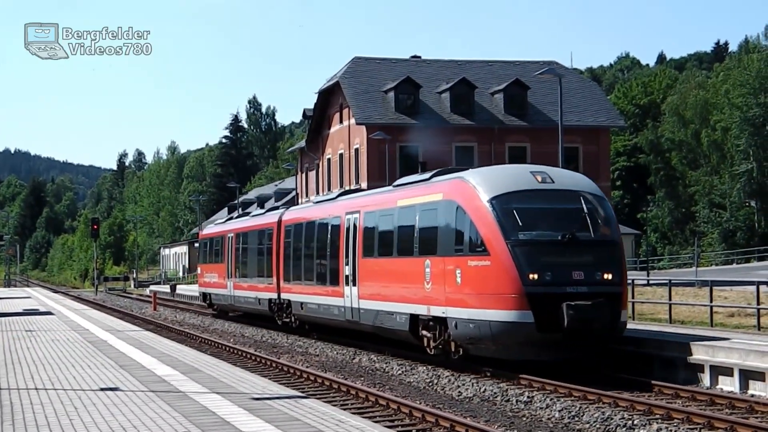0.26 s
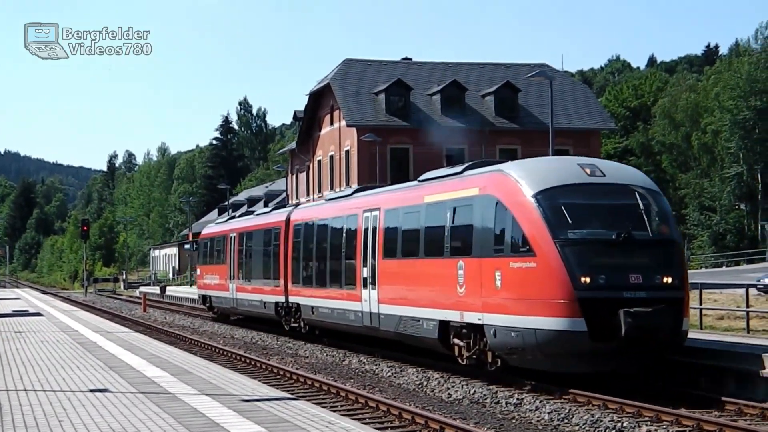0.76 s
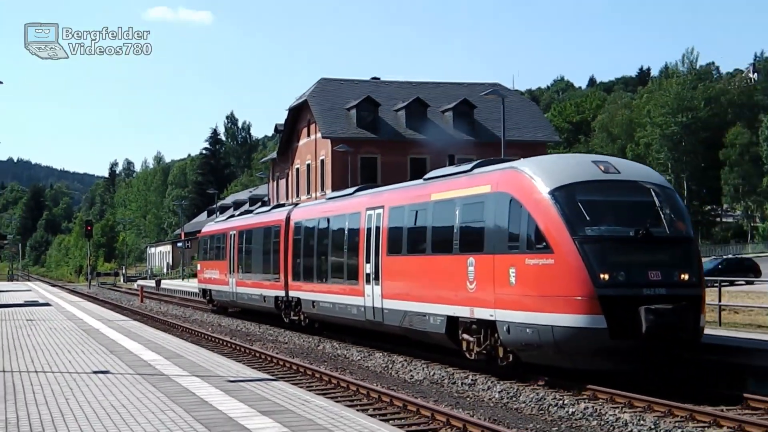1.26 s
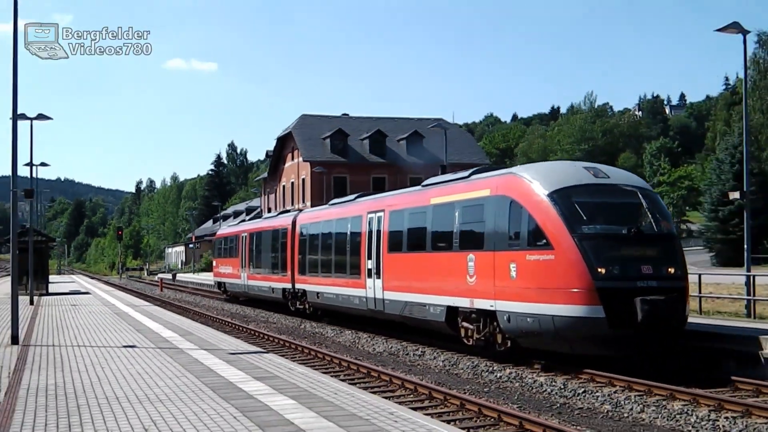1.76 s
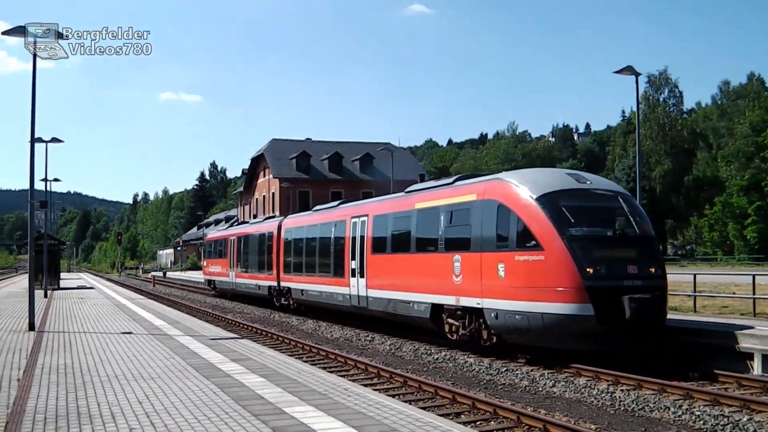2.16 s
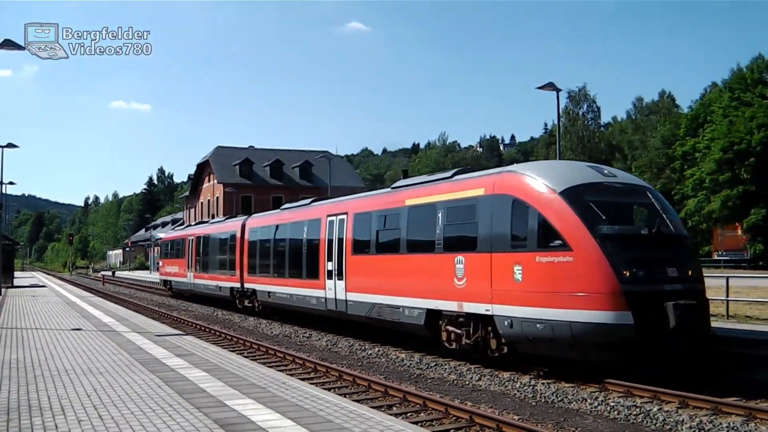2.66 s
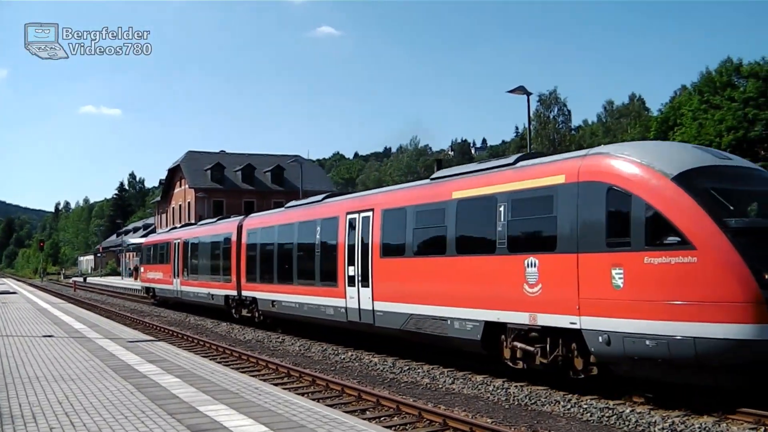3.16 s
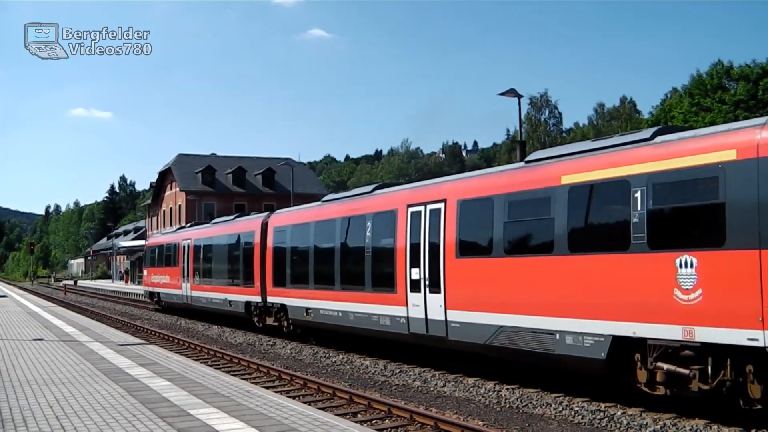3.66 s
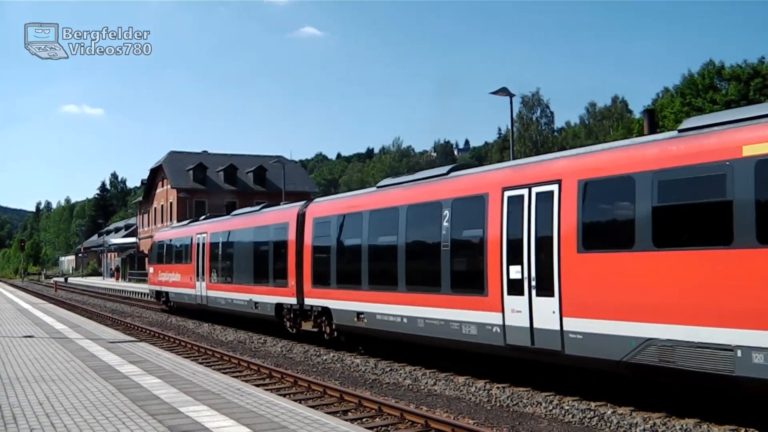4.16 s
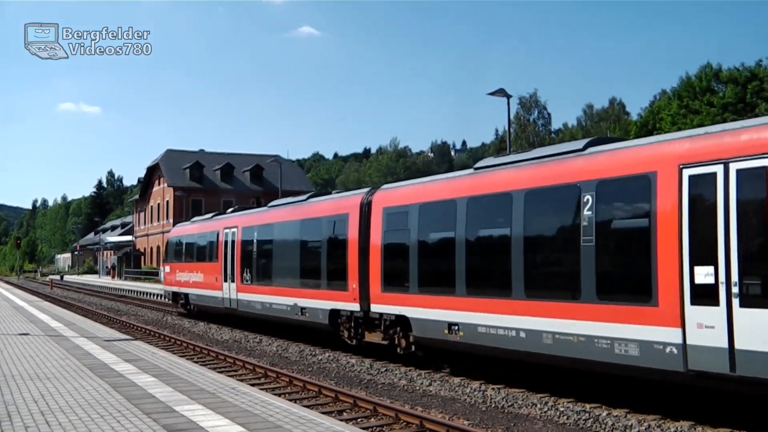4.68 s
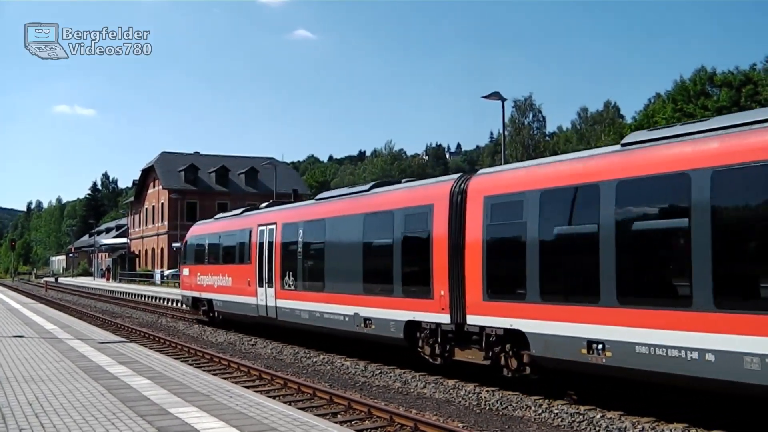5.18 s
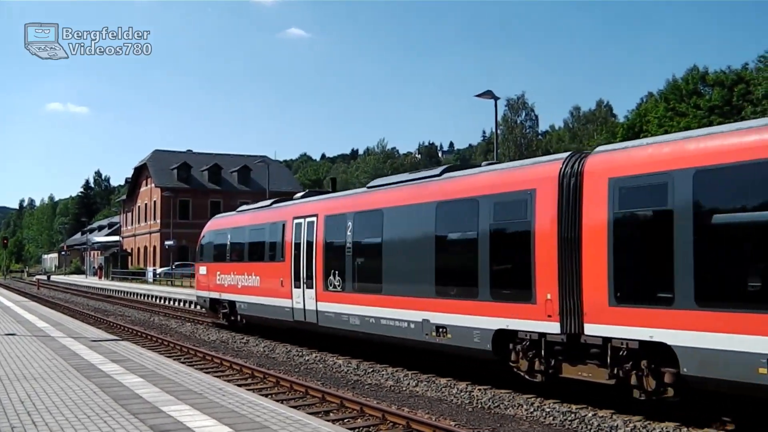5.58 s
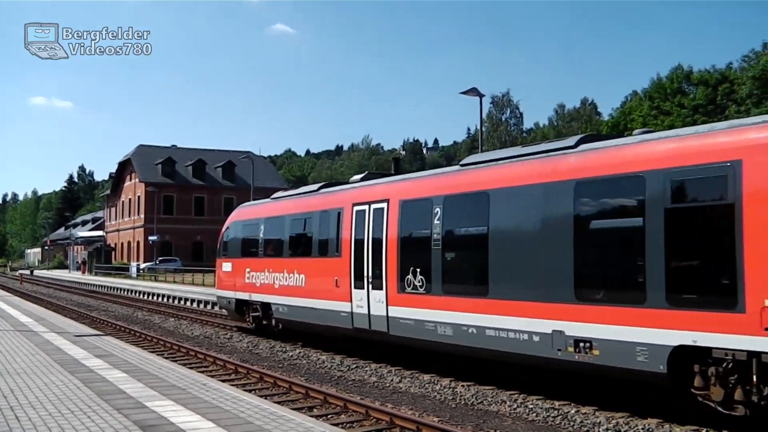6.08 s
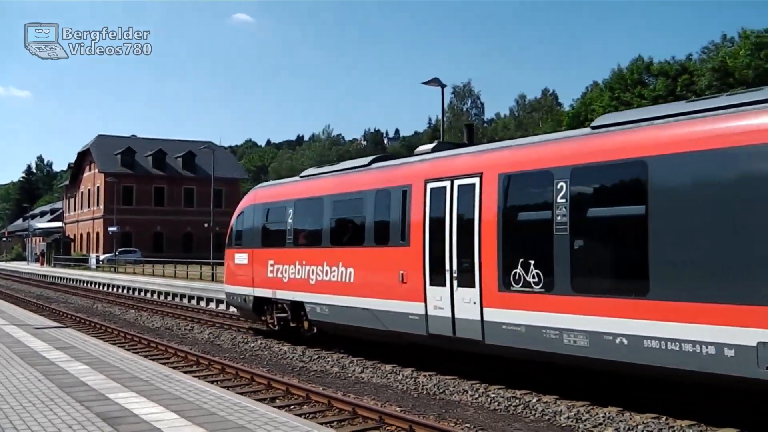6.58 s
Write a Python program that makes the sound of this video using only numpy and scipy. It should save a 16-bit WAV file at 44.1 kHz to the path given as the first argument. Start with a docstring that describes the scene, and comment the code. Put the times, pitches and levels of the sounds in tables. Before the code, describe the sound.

On an open station platform, a two-engined diesel railcar accelerates toward and past a fixed stereo microphone. A low, throbbing drone rises, dips at a gear change around two seconds, then climbs again. Rolling clatter, exhaust rumble and cooling-air hiss swell into a close pass with a faint breathy turbo whine. The front engine fades at the end as the rear one takes over.

```python
"""On a paved station platform, a two-engined diesel railcar pulls away and passes close by.
Each six-cylinder engine is a stack of sines: aligned multiples of the firing rate, weaker cycle orders
and a geared compressor. It climbs, drops at a gear change and climbs again.
Exhaust rumble, running-gear clatter and cooling-air hiss are coloured noise, heard direct and off the paving.
Narrow and broad noise bands swell as the train passes, and a turbo whines as a breathy gliding band."""
import sys
import numpy as np
from scipy import signal
from scipy.fft import rfft, irfft, next_fast_len
from scipy.io import wavfile
from scipy.ndimage import uniform_filter1d, map_coordinates

SR = 44100
rng = np.random.default_rng(int(sys.argv[2]) if len(sys.argv) > 2 else 0)


def store_wav(level_fs):
    """Save 16-bit WAV to argv[1]."""
    pcm = np.round(np.clip(np.atleast_2d(level_fs), -1, 1) * 32767)
    wavfile.write(sys.argv[1], SR, pcm.T.astype(np.int16))


N = 301203

# noise bed faders, before layer trims: t/s, running gear level/dB, cooling air level/dB
NOISE_LEVELS = [(0, -44, -44.5), (1, -40.5, -40.5), (2, -36.5, -36), (2.6, -35, -35.5), (3.4, -30.5, -32),
                (4, -27, -29), (4.7, -27, -26.5), (5.4, -27, -27), (6, -25, -30), (6.4, -25.5, -28.5),
                (6.83, -25, -28)]
# echo off the paving; its detour shrinks as the front passes, then the rear engine's takes over:
# t/s, detour/ms, strength/0-1 before its roll-off over frequency
PAVING_ECHO = [(0, 0.89, 0.6), (3.5, .89, 0.53), (4.6, 0.856, 0.58), (5.05, 0.77, 0.36), (5.5, 0.65, 0.4),
               (6.0, .4, 0.23), (6.2, .36, 0), (6.25, 0.96, 0.07), (6.83, .8, .5)]
# colour of the exhaust rumble, before scaling to rms 1: f/Hz, level/dB per Hz
RUMBLE_COLOUR = [(15, -30), (25, -8), (45, -4), (70, 1), (120, -1), (200, -4.5), (300, -1.5), (420, -5.5),
                 (550, -10.5), (800, -39)]
# colour of the running-gear clatter, before scaling to rms 1: f/Hz, level/dB per Hz
CLATTER_COLOUR = [(250, -44), (450, -9), (650, 2), (900, -0.5), (1400, -3), (1700, -3.5), (2100, -1.5),
                  (2600, -6), (3100, -8.5), (3600, -10.5), (4200, -20), (5500, -40)]
# colour of the cooling-air hiss, before scaling to rms 1: f/Hz, level/dB per Hz
HISS_COLOUR = [(2000, -31), (2900, -11.5), (3500, -7), (4000, -5.5), (4700, -3), (5400, -5.5), (6200, -2.5),
               (7300, 2), (8100, -7.5), (9000, -13), (10500, -38)]
# colour of the airy top of that hiss, before scaling to rms 1: f/Hz, level/dB per Hz
AIR_COLOUR = [(8000, -30), (9200, -1.5), (9900, -3), (10600, 1.5), (11500, 2), (12500, -4.5), (13500, -7),
              (15000, -16), (15800, -18)]
# two microphone ports, with the train ahead and beside: f/Hz, left-right level/dB ahead, beside,
# left's phase lead/rad ahead, beside, likeness/0-1 ahead, beside
PORTS = [(50, 1.7, 1.7, 0, 0, .995, .995), (1000, 2, 2, 0, -.15, .96, .96),
         (1500, .3, 0, 0, -.15, .96, .96), (2700, .8, .5, -.1, -.2, .95, .9),
         (3700, 3, 1.5, -.35, -.65, .88, .76), (4500, 1.2, -1, -.4, -.8, .9, .74),
         (5300, -4, -4, -.4, -1.2, .74, .58), (6000, -4, -4, -.9, -1.3, .8, .74),
         (6900, -11.5, -7, -2.6, -2.8, .3, .72), (7400, -6, -7, -4.5, -4, .72, .74),
         (8000, 0, -1, -4.8, -4.6, .7, .66), (9000, 7, -1, -4, -5.6, .35, .55),
         (10200, -2, -4, -4.3, -4.6, .45, .52), (11200, -1, -6, -5, -4.5, .4, .38),
         (13000, -3, -3.5, -7, -8, .15, .3), (15500, 0, .5, -6.3, -6.3, .1, .45)]
# each cooler brightens the noise while it faces the microphone: t/s, length/s, treble lift/dB
COOLERS = [(4.1, 0.6, 3), (6.6, 0.37, 0.5)]
# swells of narrow and broad noise as the train passes:
# peak t/s, length/s, f/Hz, width/Hz, level/dB before the stereo mix
NOISE_SWELLS = [(4.45, 0.074, 1325, 22, -29.5), (4.57, 0.41, 880, 85, -33.5), (4.74, 0.48, 1250, 350, -32),
                (5.06, 0.21, 1140, 60, -35.5), (5.57, 0.48, 1550, 500, -35), (4.206, 0.29, 170, 2.98, -29),
                (3.85, 0.74, 350, 20, -34), (5.43, 0.47, 398, 12, -33), (5.584, 0.41, 680, 160, -31.5),
                (5.96, 0.39, 980, 300, -32.5), (1.8, 1.8, 800, 220, -47.5), (3.27, 1.17, 2150, 450, -40.5),
                (2.85, 1.14, 3500, 400, -45.5)]
# turbo whine: t/s, f/Hz, level/dB before its trim
TURBO_WHINE = [(0, 8050, -68), (3.3, 8570, -52), (4.2, 8780, -44.5), (5.8, 8970, -44), (6.3, 9010, -52),
               (6.83, 9020, -57)]
# rear engine: t/s, firing f/Hz, drone level/dB that its multiples follow, compressor level/dB before the mix
REAR_ENGINE = [(0, 65.4, -63, -46), (1.2, 70.16, -42, -42), (1.7, 72.8, -34, -32.5),
               (2.3, 75.96, -35, -30.5), (2.72, 77.13, -36.5, -28.5), (3.0, 74.56, -36, -33),
               (3.4, 72.04, -33, -39), (3.8, 71.87, -34, -33), (4.4, 73.1, -30, -36), (5.1, 74.6, -27, -43),
               (5.8, 75.34, -26, -35), (6.5, 75.94, -18.5, -23), (6.83, 76.54, -19, -20)]
# front engine: t/s, firing f/Hz, drone level/dB that its multiples follow, compressor level/dB before the mix
FRONT_ENGINE = [(0, 74.13, -29, -32), (1.2, 78.15, -28, -34.5), (2.0, 81.2, -26, -38),
                (2.4, 77.8, -26.5, -34), (2.9, 76.22, -24, -31), (3.3, 76.48, -21.5, -41),
                (4.0, 77.6, -19, -40), (5.0, 79.18, -18, -43), (6.0, 79.8, -19.5, -41),
                (6.83, 80.4, -30.5, -42)]
# rear firing multiples 1 to 4: level/dB at the reference drone, growth/(dB per dB of drone)
REAR_MULTIPLES = [(-29.5, 0.81), (-20.5, 0.88), (-35, 0.36), (-38.5, 0.28)]
# front firing multiples 1 to 4: level/dB at the reference drone, growth/(dB per dB of drone)
FRONT_MULTIPLES = [(-19.5, 1.1), (-20, 1), (-31.5, 0.73), (-42.5, 0.2)]
# rear multiples that fade or swell as the exhaust turns past: multiple, t/s, length/s, level change/dB
REAR_TURNS = [(1, 4.99, 1.2, -9), (3, 5.5, .3, 5), (4, 2.8, 0.83, 5)]
# front multiples that briefly fade or swell: multiple, t/s, length/s, level change/dB
FRONT_FADES = [(1, -0.5, 0.23, -8), (1, 3, 0.28, -2.5), (1, 4.5, 0.33, -6), (1, 5.5, 0.34, -15.5),
               (3, 4.5, 0.39, -12), (4, 5.1, 0.7, 10.5)]
# unequal cylinders: multiple of the four-stroke cycle rate, level/dB against the drone before far-off dulling
UNEVEN_CYLINDERS = [(2, -23.5), (4, -19), (5, -14.5), (8, -24), (10, -27.5), (13, -21), (14, -23),
                    (15, -21), (16, -17), (20, -23.5), (26, -28), (27, -20), (28, -20.5), (30, -18),
                    (31, -22.5), (32, -20.5), (34, -21), (36, -24)]
# weak compressor tones: multiple of its speed, level/dB against its first strong tone
WEAK_PUMP_TONES = [(1, -19), (4, -15), (6, -11.5), (7, -9)]

FRAME = 1024  # samples
ARRIVE_S, BESIDE_S = 3.3, 4.3  # the nose reaches the microphone; the train stands fully beside it
COOLER_HZ = 5900  # the cooler lift is heard above this
REFERENCE_DB = -27  # reference fader level of clatter and hiss
RUMBLE_DB, RUMBLE_GROWS = -24.5, 0.73  # level at that clatter reference; dB per dB of clatter
AIR_DB, AIR_GROWS = -36.0, 1.17  # level at that hiss reference; dB per dB of hiss
# the front exhaust thickens the rumble as it passes
EXHAUST_S, EXHAUST_LENGTH_S, EXHAUST_DB = 5.28, 0.45, 2.5
DRONE_REFERENCE_DB = -20  # reference drone of the firing multiples
GEARING = 0.408  # compressor turns per firing
SECOND_PUMP_DB = -2  # the compressor's second strong tone against its first
NOTCH_HZ, NOTCH_HALF_WIDTH_HZ, TOP_HZ = 7870, 120, 15760


def amp(db):
    """Gain of a level in dB."""
    return 10 ** (np.asarray(db) / 20)


def unit(x):
    """x at rms 1."""
    return x / np.sqrt(np.mean(x ** 2) + 1e-20)


def curves(rows, t=None):
    """Each column after the first, read at t (every sample if not given)."""
    if t is None:
        t = np.arange(N) / SR
    at, *columns = np.transpose(rows)
    return [np.interp(t, at, column) for column in columns]


def wobble(rate):
    """A smooth random curve with rate knots a second."""
    knots = rng.standard_normal(int(N * rate / SR) + 4)
    return map_coordinates(knots, [np.arange(N) * rate / SR])


def swell(s, length):
    """A bell-shaped rise and fall around s, down to 1/e at length either side."""
    return np.exp(-((np.arange(N) / SR - s) / length) ** 2)


def noise_band(hz, width_hz):
    """A carrier smeared into noise by a random complex envelope with width_hz knots a second."""
    carrier = np.exp(2j * np.pi * np.cumsum(hz * np.ones(N)) / SR)
    envelope = wobble(width_hz) + 1j * wobble(width_hz)
    return unit((envelope * carrier).real)


def tone(turns, db, waver_db, slip):
    """A sine that follows a count of turns, a little unsteady in level and phase (slip in radians)."""
    level = np.sqrt(2) * amp(db + waver_db * wobble(6))
    return level * np.cos(2 * np.pi * turns + slip * wobble(5))


def paving_comb(f, t, beside, echo_hz):
    """Delayed copies off the paving and platform edge comb the spectrum as path lengths change."""
    delay_ms, strength = curves(PAVING_ECHO, t)
    # a later, duller echo off the platform edge
    kerb = 0.44 * strength * (1 - 0.08 * beside) / (1 + (f / 1700) ** 4)
    # rough paving scatters the treble, so the comb fades upwards
    echo = np.clip(strength, 0, 1) / (1 + (f / echo_hz) ** 4)
    # the low end comes from the whole length of the train and blurs
    echo = echo * np.clip(f / 900, 0, 1)
    paving = (1 + echo * np.exp(-2j * np.pi * f * delay_ms / 1000)) / np.sqrt(1 + echo ** 2)
    return paving * (1 + kerb * np.exp(-2j * np.pi * f * 0.002103))


def port_pair(shared, own, hz, beside):
    """Two ports hear one source with level, phase and likeness that vary over frequency and angle."""
    columns = [c[:, None] for c in curves(PORTS, hz)]
    pan, lead, alike = [
        ahead + beside * (side_on - ahead) for ahead, side_on in zip(columns[::2], columns[1::2])]
    turn = np.arccos(np.clip(alike, 0, 1)) / 2
    mid, side = np.cos(turn) * shared, np.sin(turn) * own
    tilt = amp(pan / 2) * np.exp(1j * lead / 2)
    power = (abs(tilt) ** 2 + abs(tilt) ** -2) / 2
    return np.array([(mid + side) * tilt, (mid - side) / tilt]) / np.sqrt(power)


def rush(spectrum, echo_hz, patchy_db):
    """Patchy noise of this colour as both ports hear it, direct and off the paving; rms 1 overall."""
    hz, t, (shared, own) = signal.stft(rng.standard_normal((2, N)), SR, nperseg=FRAME)
    f = hz[:, None]
    beside = np.clip((t - ARRIVE_S) / (BESIDE_S - ARRIVE_S), 0, 1)
    table_hz, table_db = np.transpose(spectrum)
    level_db = np.interp(np.log(hz + 1), np.log(table_hz), table_db, left=-120, right=-120)
    patches = rng.standard_normal(shared.shape)
    patches = uniform_filter1d(uniform_filter1d(patches, size=8, axis=0), size=5, axis=1)
    # sound from the side rings the port cavities
    cavity_db = 2.0 * beside * np.exp(-((f - 6400) / 800) ** 2)
    cooler_db = sum(db * np.exp(-((t - s) / length) ** 2) for s, length, db in COOLERS)
    cooler_db = cooler_db / (1 + (COOLER_HZ / (f + 1)) ** 6)
    colour = amp(level_db[:, None] + cooler_db + cavity_db + patchy_db * unit(patches))
    colour = colour * paving_comb(f, t, beside, echo_hz)
    pair = colour * port_pair(shared, own, hz, beside)
    return unit(signal.istft(pair, SR, nperseg=FRAME)[1][:, :N])


def cooling_air(hiss_db, beat):
    """Turbulent hiss and its airy top, pulsing with the crankshaft and fluttering."""
    air_db = AIR_DB + AIR_GROWS * (hiss_db - REFERENCE_DB)
    flutter = 0.5 * wobble(11) + 0.5 * wobble(30)
    hiss_gain = amp(hiss_db + 3.5 + 1.3 * beat + 0.44 * flutter)
    hiss = hiss_gain * rush(HISS_COLOUR, echo_hz=2830, patchy_db=1.08)
    air_gain = amp(air_db + 2.1 * beat + 1.0 * flutter)
    return hiss + air_gain * rush(AIR_COLOUR, echo_hz=2500, patchy_db=1.5)


def running_gear(clatter_db, beat):
    """Midrange clatter as noise that pulses with the crankshaft."""
    gain = amp(clatter_db + 0.38 + 1.4 * beat + 0.6 * wobble(9))
    return gain * rush(CLATTER_COLOUR, echo_hz=2400, patchy_db=0.68)


def exhaust_rumble(clatter_db):
    """Low noise that grows with the clatter and thickens as the front exhaust passes."""
    rumble_db = RUMBLE_DB + RUMBLE_GROWS * (clatter_db - REFERENCE_DB)
    rumble_db = rumble_db + EXHAUST_DB * swell(EXHAUST_S, EXHAUST_LENGTH_S)
    return amp(rumble_db) * rush(RUMBLE_COLOUR, echo_hz=5000, patchy_db=1.5)


def roar(firings):
    """The noise layers, with a shared beat at half the firing rate, crank speed and the firing rate."""
    clatter_db, hiss_db = curves(NOISE_LEVELS)
    beat = 0.22 * np.cos(np.pi * firings)
    beat += 0.25 * np.cos(2 * np.pi * firings / 3)
    beat += 0.22 * np.cos(2 * np.pi * firings)
    return cooling_air(hiss_db, beat) + running_gear(clatter_db, beat) + exhaust_rumble(clatter_db)


def noise_swells():
    """Narrow and broad bands of noise that each rise and fall once as the train passes."""
    return sum(amp(db) * swell(s, length) * noise_band(hz, width)
               for s, length, hz, width, db in NOISE_SWELLS)


def turbo():
    """A breathy whine: two noise bands on one gliding pitch, reaching the right port a little late."""
    hz, db = curves(TURBO_WHINE)
    breath = noise_band(hz, width_hz=260) + amp(-3) * noise_band(hz, width_hz=700)
    whine = amp(db + 1.0 + 1.1 * wobble(14)) * breath
    return np.array([whine, amp(4.5) * np.roll(whine, shift=4)])


def compressor(firings, pump_db):
    """A geared pump sounds at multiples of its own speed, the second and third strongest."""
    pump = GEARING * firings
    strong_db = [pump_db, pump_db + SECOND_PUMP_DB]
    out = sum(tone(k * pump + rng.random(), db, waver_db=1, slip=0.2) for k, db in enumerate(strong_db, 2))
    for k, db in WEAK_PUMP_TONES:
        out += tone(k * pump + rng.random(), pump_db + db, waver_db=3.0, slip=0.25)
    return out


def exhaust_pulses(firings, firing_db):
    """Exhaust pulses as phase-aligned multiples of the firing rate, the upper ones less steady."""
    return sum(tone(k * firings, db, waver_db=0.48 * k ** 1.26, slip=0.095 * k ** 1.42)
               for k, db in enumerate(firing_db, 1))


def uneven_cylinders(firings, firing_db):
    """Unequal cylinders add orders of the four-stroke cycle, six firings long."""
    drone_db = uniform_filter1d(np.maximum(firing_db[0], firing_db[1]), size=SR // 2)
    dull_db = 0.014 * (drone_db + 19.0)  # a far, quiet engine has lost its upper orders
    return sum(tone(k * firings / 6 + rng.random(), drone_db + db + k * dull_db, waver_db=3.5, slip=0.7)
               for k, db in UNEVEN_CYLINDERS)


def engine(rows, multiples, turns):
    """One engine and its count of firings; the firing multiples follow its drone and briefly fade or swell."""
    hz, drone_db, pump_db = curves(rows)
    firings = np.cumsum(hz) / SR
    firing_db = [db + grows * (drone_db - DRONE_REFERENCE_DB) for db, grows in multiples]
    for which, s, length, turn_db in turns:
        firing_db[round(which) - 1] += turn_db * swell(s, length)
    out = exhaust_pulses(firings, firing_db) + uneven_cylinders(firings, firing_db)
    return out + compressor(firings, pump_db), firings


def scene():
    """Noise bed, noise swells, turbo and both engines; the front engine sets the beat of the noise bed."""
    rear, _ = engine(REAR_ENGINE, REAR_MULTIPLES, REAR_TURNS)
    front, firings = engine(FRONT_ENGINE, FRONT_MULTIPLES, FRONT_FADES)
    low = front + rear + noise_swells()
    late = np.roll(low, 1)  # engines and swells reach the left port a little late
    stereo = np.array([0.4 * late + 0.61 * low, low]) * amp([[0.8], [-0.9]])
    return roar(firings) + turbo() + stereo


def record(dry):
    """The microphone adds a faint hiss, notches out one narrow band and keeps nothing above its limit."""
    hissy = dry + amp(-49.0) * rng.standard_normal(dry.shape)
    wet = np.pad(hissy, ((0, 0), (FRAME, FRAME)), mode="reflect")
    m = next_fast_len(N + SR // 2)
    hz = np.fft.rfftfreq(m, 1 / SR)
    off = (hz - NOTCH_HZ) / NOTCH_HALF_WIDTH_HZ
    response = (off / (off - 1j)) ** 2 * (hz < TOP_HZ)
    return irfft(rfft(wet, m) * response, m)[:, FRAME:FRAME + N]


dry = scene()
out = record(dry)
store_wav(out)
```